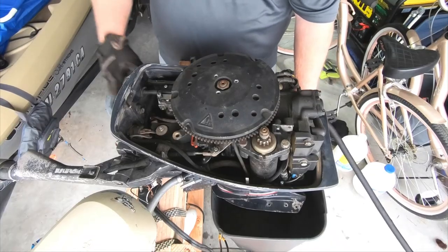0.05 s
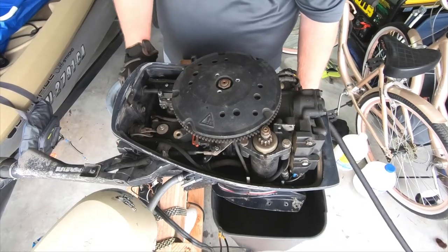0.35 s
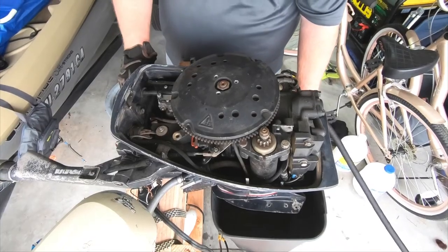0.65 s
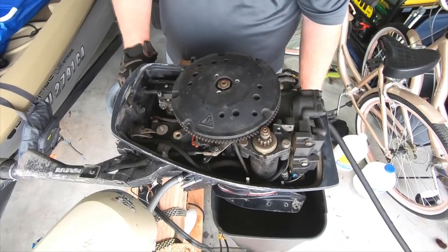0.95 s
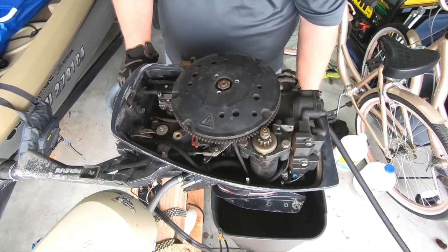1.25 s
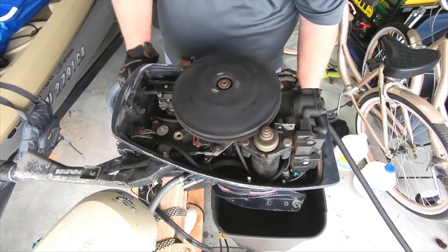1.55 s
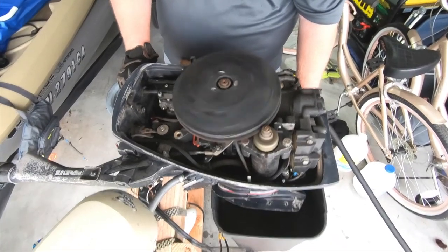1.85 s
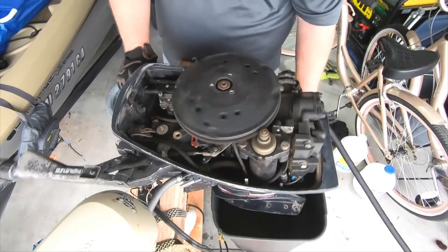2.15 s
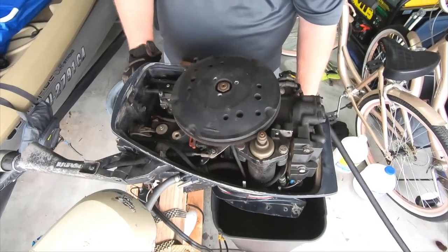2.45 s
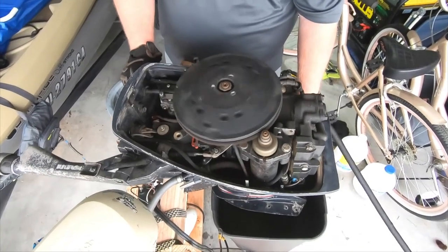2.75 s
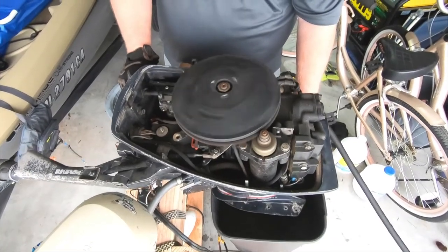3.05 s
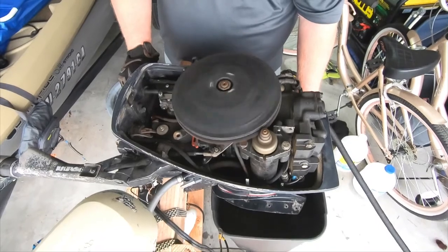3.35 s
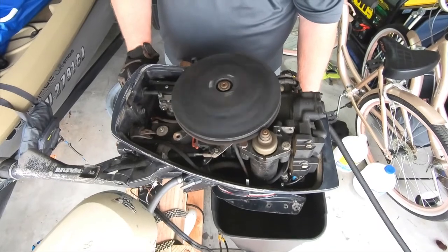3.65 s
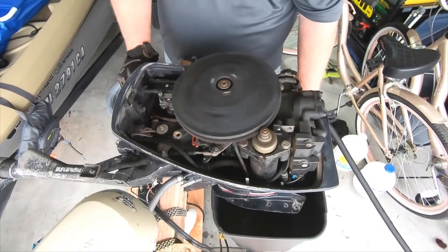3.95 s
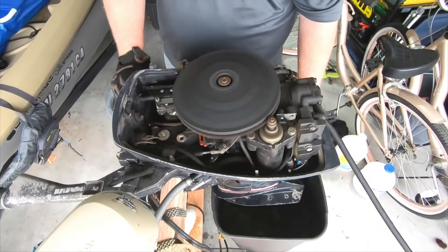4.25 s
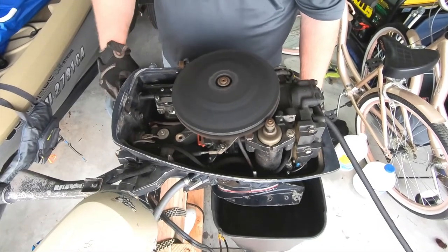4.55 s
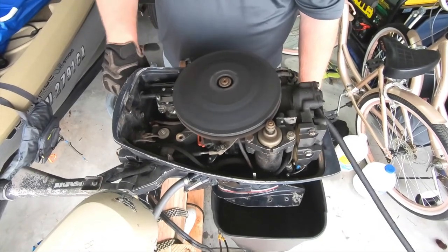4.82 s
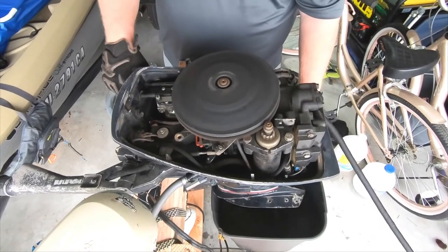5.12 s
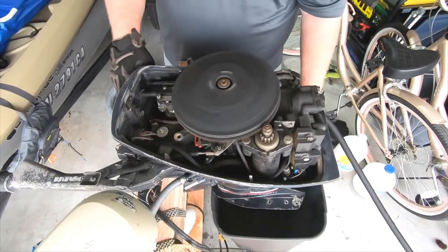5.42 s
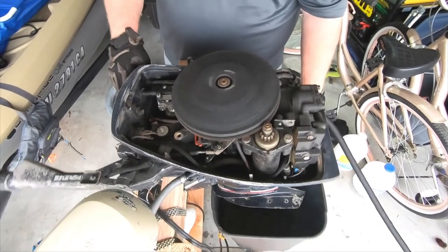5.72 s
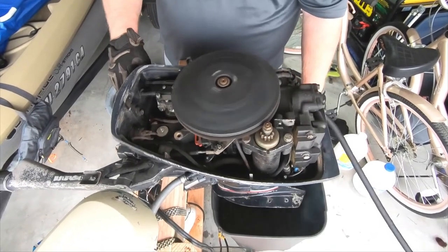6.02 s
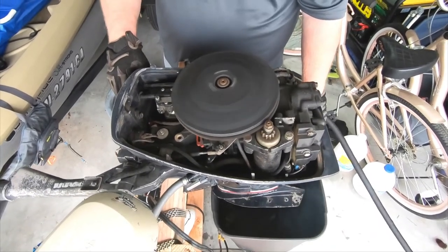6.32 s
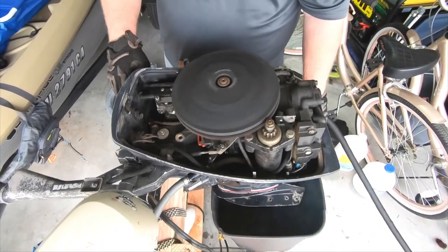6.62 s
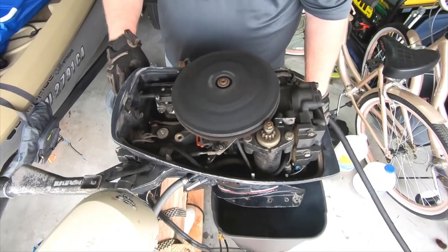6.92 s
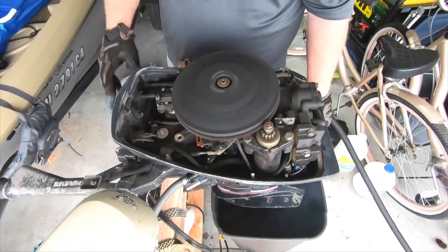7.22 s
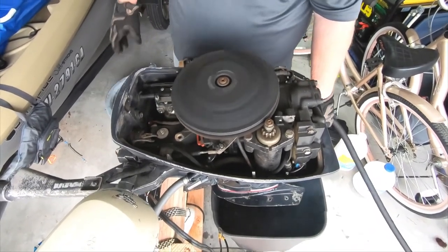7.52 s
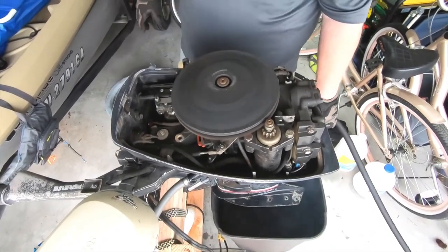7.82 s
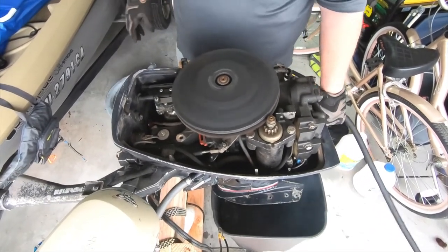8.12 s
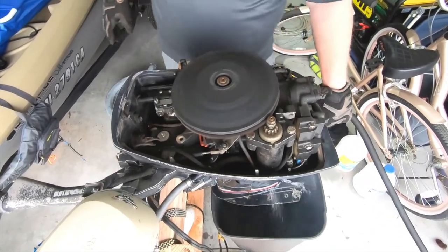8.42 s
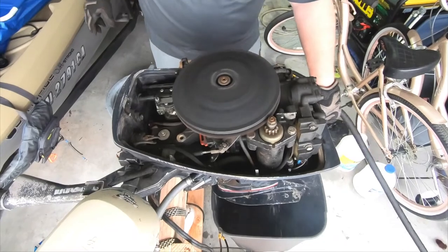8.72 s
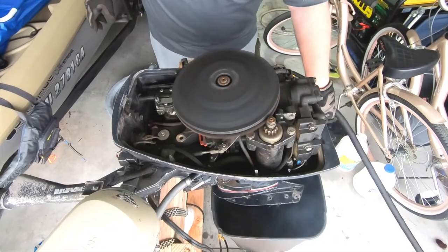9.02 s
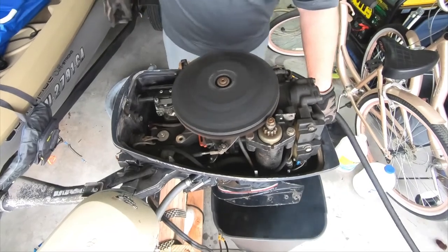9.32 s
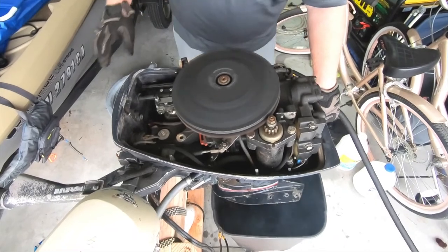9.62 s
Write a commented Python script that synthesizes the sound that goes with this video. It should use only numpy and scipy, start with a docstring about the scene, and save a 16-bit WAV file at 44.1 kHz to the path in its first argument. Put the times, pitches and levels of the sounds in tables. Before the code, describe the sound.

Close by in a garage, a small outboard motor is started while its cooling water splashes faintly into a tub. The starter engages with a steel clank and rasps in pulses, twice. On the second try the engine fires and speeds up, then slows to a weak sputter. It picks up again and idles unevenly, with hollow exhaust pops, metallic clatter and a low rumble.

```python
"""A small two-stroke outboard starts up, uncowled in a garage, its cooling water splashing into a tub.
The electric starter clanks in and grinds twice, pinion teeth rasping on the ring gear. On the second
try the engine catches, races, sags almost to a stall and settles to a lumpy idle. Only some strokes
fire fully, each ringing the exhaust housing with a round putt, while pistons and linkage clatter."""
import sys
import numpy as np
from scipy import signal
from scipy.fft import rfft, irfft
from scipy.io import wavfile
from scipy.ndimage import uniform_filter1d, minimum_filter1d

SR = 44100
rng = np.random.default_rng(int(sys.argv[2]) if len(sys.argv) > 2 else 0)


def digitize_waveform(pressure):
    """Quantize a signal to 16-bit integers and store it at the path in sys.argv[1].

    Rows of a 2-D input are taken as channels; values are limited to [-1, 1].
    """
    field = np.atleast_2d(pressure).T
    bounded = np.clip(field, -1, 1)
    quanta = np.round(bounded * 32767).astype(np.int16)
    wavfile.write(sys.argv[1], SR, quanta)


N = 435266
TIME = np.arange(N) / SR

# fader ride of the cooling water: t/s, level/dB
WATER_RIDE = [(0, -39.5), (1.35, -38), (2.1, -43.5), (2.55, -46.5), (4.2, -36.5), (9.87, -35)]
# bigger splashes: t/s, level/dB
SPLASHES = [(0.86, -42), (1.04, -38)]
# EQ of the spatter: f/Hz, level/dB
WATER_EQ = [(30, -52), (70, -8.5), (110, -23.5), (240, -0.5), (370, -16.5), (490, -6), (680, -16),
            (1100, -14), (2100, -19.5), (3300, -33), (4400, -23), (6000, -24.5), (7200, -37),
            (11000, -55.5), (15000, -80)]
# hollow tub: f/Hz, level/dB, t60/s
TUB_MODES = [(243, -0.5, 0.1), (476, -6, 0.14), (498, 1.5, 0.096), (845, -10, 0.037), (1080, -7, 0.047),
             (1579, -3.5, 0.29)]
# fader ride of the faint high hiss: t/s, level/dB
HIGH_HISS_RIDE = [(0, -63.5), (1.3, -61.5), (2.1, -50), (2.45, -74), (4.3, -69), (5.15, -63), (5.45, -84),
                  (7, -85), (8.8, -62.5), (9.87, -61.5)]
# the pinion slams into the ring gear or is kicked back: t/s, level/dB
CLANKS = [(1.3283, -30), (1.3642, -9), (2.112, -35), (2.138, -9), (2.169, -13), (2.2, -8), (2.655, -29.5),
          (2.671, -16), (3.9827, -10), (4.0239, -12), (4.058, -11), (4.1042, -13), (4.1682, -17),
          (4.202, -23)]
# EQ of grinding, cracking steel: f/Hz, level/dB
GRIND_EQ = [(100, -10), (300, -6.5), (480, 2), (650, -2.5), (800, 2.5), (1050, -4), (1500, 4), (2100, -0.5),
            (3500, -4.5), (4300, 1), (5600, -0.5), (6900, -7.5), (7800, -21), (11200, -44.5), (13000, -31),
            (15500, -56)]
# starter bracket, knocked by the clanks: f/Hz, level/dB, t60/s
BRACKET_MODES = [(489, -12, 0.14), (623, -7, 0.11), (835, -1.5, 0.11), (926, 2.5, 0.091), (1270, 8, 0.05)]
# bell tone of the flywheel: f/Hz, level/dB, t60/s
FLYWHEEL_MODES = [(2755, 0, .13), (2790, -4, .1)]
# the tub's hollow mid hum swells during the first try: t/s, level/dB
TUB_HUM_SWELLS = [(1.36, -30.5)]
# each try of the starter: engages/s, lets go/s, spin-up/s, level/dB
STARTER_TRIES = [(1.362, 2.092, 0.2, 1.5), (2.669, 3.983, 0.2, 0)]
# starter and ring gear: f/Hz, level/dB, t60/s
GEAR_MODES = [(517, -11, 0.13), (1273, -7.5, 0.11), (1350, -9.5, 0.051), (1491, 0.5, 0.079),
              (1548, -2, 0.036), (1735, -8, 0.033), (4290, -15.5, 0.17), (4410, -7.5, 0.053),
              (6620, -7, 0.074), (6750, -44, 0.12)]
# hard jolts of the mount under the starter's load: t/s, level/dB
JOLTS = [(1.385, -20), (1.535, -23.5), (1.7, -28), (2.16, -23.5), (2.21, -32.5), (2.685, -13.5),
         (3.03, -22), (3.405, -25), (3.99, -21)]
# shuddering mount: f/Hz, level/dB, t60/s
MOUNT_MODES = [(65, -16, .12), (162.3, 7.5, 0.079), (164.4, 0.5, 0.18), (239.2, 0, 0.15),
               (283, -3.5, 0.095)]
# engine speed: t/s, rate/(strokes per s)
ENGINE_SPEED = [(4.05, 25.5), (4.17, 44), (4.5, 47), (4.63, 48.3), (4.83, 33.2), (5.08, 30.5), (5.3, 20.5),
                (5.6, 21.5), (6.0, 18.1), (6.5, 17.9), (6.65, 25), (7.2, 26.4), (7.75, 29), (7.9, 31.3),
                (9.9, 32.8)]
# the pops, strokes that fire fully: t/s, ring level/dB, thump level/dB
POPS = [(4.0472, -26, -9), (4.0796, -26, -15.5), (4.1101, -17, -8), (4.1836, -9, -10), (4.273, -14.5, -12),
        (4.337, -15, -15.5), (4.5074, -12, -16), (4.7398, -23, -18), (4.9064, -22, -15.5),
        (5.1034, -20.5, -14.5), (5.2158, -26, -19), (5.4044, -31, -21.5), (5.456, -20, -11.5),
        (5.5866, -26, -31), (5.7539, -25, -10.5), (5.902, -28, -20), (6.0148, -28, -19), (6.0779, -26, -11),
        (6.2215, -28, -16), (6.2712, -18.5, -12), (6.4135, -26, -19.5), (6.5806, -20.5, -10),
        (6.699, -22, -15), (6.7389, -18.5, -10.5), (6.818, -16.5, -11), (6.9776, -18.5, -10),
        (7.1325, -17.5, -12.5), (7.2103, -18.5, -21), (7.2497, -19.5, -11.5), (7.2852, -15.5, -15.5),
        (7.4268, -19, -25), (7.4655, -22, -14.5), (7.579, -14, -11.5), (7.6762, -16.5, -26),
        (7.8582, -12, -12), (7.9509, -17.5, -14.5), (8.0478, -15, -15.5), (8.1428, -21, -17.5),
        (8.176, -16.5, -28), (8.2091, -19, -20), (8.2417, -13.5, -15), (8.4253, -13, -17.5),
        (8.5148, -16, -31), (8.606, -14, -20), (8.6672, -14.5, -16), (8.7887, -14, -16),
        (8.8827, -15.5, -18), (8.9779, -15.5, -18), (9.1046, -12.5, -17), (9.228, -13, -15),
        (9.3493, -13, -16.5), (9.4102, -16.5, -41), (9.4708, -13.5, -17), (9.5921, -14.5, -34),
        (9.6546, -14, -15.5), (9.7753, -14, -25), (9.8375, -14, -14)]
# ring of the exhaust housing: f/Hz, level/dB, t60/s
EXHAUST_MODES = [(436, 0, 0.1), (469.8, 7.5, 0.083), (520.7, 5, 0.062)]
# the housing's deeper thump: f/Hz, level/dB, t60/s
THUMP_MODES = [(174.3, 3.5, 0.046), (234.5, -3, 0.12), (291.6, -2, 0.11), (295, -11, 0.0043)]
# EQ of piston knocks and spitting gas: f/Hz, level/dB
CLATTER_EQ = [(80, -12.5), (300, 19), (700, 4.5), (1100, 12), (1600, 6.5), (2300, -0.5), (2800, 1.5),
              (3300, -9), (4300, -4), (5000, -1.5), (5800, -5), (7000, -17), (9000, -25), (11200, -53),
              (15000, -45)]
# engine block: f/Hz, level/dB, t60/s
BLOCK_MODES = [(1509, -5, 0.18), (2750, -3.5, 0.058), (4217, 3.5, 0.025), (4620, -5, 0.045),
               (5670, -2, 0.044)]
# EQ of the exhaust's bark: f/Hz, level/dB
BARK_EQ = [(150, -21.5), (360, 2), (580, 4.5), (750, -8), (1050, 2.5), (2000, -22.5), (6000, -54)]
# leg and tub, shaken by every stroke: f/Hz, level/dB, t60/s
PUMP_MODES = [(68.4, -18.5, 0.59), (98.3, 4, 0.14), (143.8, 4, 0.24), (166.5, 5, 0.062),
              (240.8, -3.5, 0.13), (277, -22.5, 0.051), (468.4, -0.5, 0.16)]
# EQ of the stand rumbling under the running engine: f/Hz, level/dB
RUMBLE_EQ = [(20, -14.5), (32, -11), (62, 0), (110, -4.5), (170, -1), (400, -19.5), (1500, -75.5)]
# loose linkage clinks: t/s, level/dB
CLINKS = [(5.378, -47), (5.421, -38), (6.552, -27.5)]


def from_db(db):
    return 10 ** (np.asarray(db) / 20)


def rms_one(x):
    return x / np.sqrt(np.mean(x ** 2) + 1e-20)


def band(x, low_hz, high_hz, order=2):
    sos = signal.butter(order, [low_hz, min(high_hz, .45 * SR)], "band", fs=SR, output="sos")
    return signal.sosfilt(sos, x)


def fader(ride, fade_s=0.006):
    """Gain that follows a fader ride, silent outside its span."""
    s, db = np.transpose(ride)
    inside = np.clip(np.minimum(TIME - s[0], s[-1] - TIME) / fade_s + 2, 0, 1)
    return inside * from_db(np.interp(TIME, s, db))


def swells(events, rise_s):
    """Each event swells to its level in the rise time and ebbs away."""
    ages = [(np.maximum(TIME - s, 0) / rise_s, db) for s, db in events]
    return sum(from_db(db) * age * np.exp(1 - age) for age, db in ages)


def clicks(times, db):
    """One impulse at each moment."""
    samples = np.clip(np.round(times * SR).astype(int), 0, N)
    return np.bincount(samples, from_db(db), N + 1)[:N]


def ring(x, hz, t60):
    """A resonator: a unit click sets a sine of height 1 ringing."""
    r, w = from_db(-60 / (t60 * SR)), 2 * np.pi * hz / SR
    return signal.lfilter([0, np.sin(w)], [1, -2 * r * np.cos(w), r * r], x + 1e-18)


def struck(times, db, modes, vary_db):
    """Each blow strikes each mode with a strength of its own; one row per mode."""
    return np.array([ring(clicks(times, db + level + rng.normal(0, vary_db, len(times))), hz, t60)
                     for hz, level, t60 in modes])


def driven(x, modes):
    """Modes kept ringing by a continuous drive, lows and highs trimmed; rms 1."""
    rings = sum(from_db(level) * rms_one(ring(x, hz, t60)) for hz, level, t60 in modes)
    return rms_one(band(rings, .75 * modes[0][0], 1.3 * modes[-1][0]))


def levelled(x, window_s):
    """A leveller: irons out slow swells, leaving the rms near 1."""
    size = int(window_s * SR)
    power = uniform_filter1d(uniform_filter1d(x ** 2, size), size)
    return x / np.sqrt(np.abs(power) + 1e-4 * np.mean(x ** 2))


def bursts(hits, t60):
    """Every hit gets a decaying tail of noise."""
    energy = signal.lfilter([1], [1, -from_db(-120 / (t60 * SR))], hits ** 2 + 1e-18)
    return np.sqrt(energy) * rng.standard_normal(N)


def eq(x, curve, size=2048):
    """Minimum-phase EQ that keeps the power of white noise."""
    hz, db = np.transpose(curve)
    grid_hz = np.maximum(np.fft.rfftfreq(size, 1 / SR), 1)
    gain = rms_one(from_db(np.interp(np.log(grid_hz), np.log(hz), db)))
    cepstrum = irfft(np.log(gain))
    cepstrum[1:size // 2] *= 2
    cepstrum[size // 2 + 1:] = 0
    return signal.oaconvolve(x, irfft(np.exp(rfft(cepstrum))))[:N]


def garage(x, wet_db, t60=0.48, predelay_s=0.016):
    """Clutter and walls return a short diffuse tail."""
    t = TIME[:SR // 2]
    tail = rng.standard_normal(len(t)) * from_db(-60 * t / t60) * (t > predelay_s)
    return x + from_db(wet_db) * signal.oaconvolve(x, tail / np.linalg.norm(tail))[:N]


def water(drops_per_s=900, tub_db=-10):
    """Cooling water spatters without pause and keeps the hollow tub humming."""
    drops = (rng.random(N) < drops_per_s / SR) * rng.rayleigh(1, N)
    spatter = rms_one(bursts(drops, t60=0.14))
    hum = from_db(tub_db) * levelled(driven(spatter, TUB_MODES), 0.19)
    flow = fader(WATER_RIDE) + swells(SPLASHES, rise_s=0.016)
    return flow * (eq(spatter, WATER_EQ) + hum)


def high_hiss():
    """A thin, wide hiss comes and goes at the very top, leaning slightly left."""
    hiss = rms_one(band(rng.standard_normal((2, N)), 12000, 14300, order=3))
    return fader(HIGH_HISS_RIDE) * hiss * from_db([[1], [-1]])


def pinion(crack_db=-3, edge_db=-21, knock_db=-15.5, bell_db=-9.5):
    """Steel slams on the flywheel's rim: a bright-edged crack, a bracket knock and a bell tone."""
    s, db = np.transpose(CLANKS)
    blows = bursts(clicks(s, db + crack_db), t60=0.06)
    crack = eq(blows, GRIND_EQ) + from_db(edge_db) * band(blows, 7400, 20000)
    knock = struck(s, db + knock_db, BRACKET_MODES, vary_db=1).sum(0)
    bell = struck(s, db + bell_db, FLYWHEEL_MODES, vary_db=1.5).sum(0)
    return crack + band(knock, 380, 2000) + band(bell, 1500, 5000)


def tub_hum_swell():
    """The tub's hollow mid hum swells during the first try."""
    hum = band(driven(rng.standard_normal(N), TUB_MODES), 410, 900, order=3)
    return swells(TUB_HUM_SWELLS, rise_s=0.18) * rms_one(hum)


def crank(engages, lets_go, spin_up, coast_s=0.3, compressions_per_s=11.2):
    """The flywheel spins up, then coasts when let go: share of full speed, compressions passed."""
    speed = 1 - np.exp(-np.maximum(TIME - engages, 0) / spin_up)
    speed *= np.exp(-np.maximum(TIME - lets_go, 0) / coast_s)
    return speed, np.cumsum(speed) * compressions_per_s / SR


def starter_load(lag_cycles, ease_db, slow_ease_db=18.5, release_db_per_s=93):
    """Envelope of the starter's effort: it eases between compressions, most while still slow."""
    load = 0
    for engages, lets_go, spin_up, db in STARTER_TRIES:
        speed, passed = crank(engages, lets_go, spin_up)
        between = .5 - .5 * np.cos(2 * np.pi * (passed - lag_cycles * speed))
        dip_db = between * (ease_db + slow_ease_db * (1 - speed) * (TIME < lets_go))
        release_db = release_db_per_s * np.maximum(TIME - lets_go, 0)
        load += (TIME > engages) * from_db(db - dip_db - release_db)
    return load


def starter(teeth_per_s=480, casing_db=-24.5, gear_db=-26, flywheel_db=-27.5, shudder_db=-25.5):
    """Teeth knock unevenly on the ring gear: the casing rasps, the flywheel rings, the mount shudders."""
    times = np.cumsum(rng.uniform(.5, 1.5, 6000)) / teeth_per_s
    tooth_db = 3.5 * np.clip(rng.standard_normal(len(times)), -2, 2)
    rasp = bursts(clicks(times, tooth_db), t60=0.025)
    casing = from_db(casing_db) * levelled(eq(rasp, GRIND_EQ), 0.048)
    gears = from_db(gear_db) * levelled(driven(rasp, GEAR_MODES), 0.07)
    flywheel = from_db(flywheel_db) * levelled(driven(rasp, FLYWHEEL_MODES), 0.24)
    mount = levelled(band(driven(rasp, MOUNT_MODES), 156, 297), 0.034)
    shudder = from_db(shudder_db) * starter_load(lag_cycles=0.19, ease_db=4)
    return (casing * starter_load(lag_cycles=0.014, ease_db=5)
            + gears * starter_load(lag_cycles=0, ease_db=2)
            + flywheel * starter_load(lag_cycles=-0.31, ease_db=4.5)
            + mount * (shudder + swells(JOLTS, rise_s=0.021)))


def grunt(start_hz=199.4, end_hz=129.2, sink_s=0.0266, delay_s=0.015, grunt_db=-14.5):
    """The starter strains against the standing flywheel and its pitch sinks."""
    grunts = 0
    for engages, _, _, db in STARTER_TRIES:
        start = engages + delay_s
        hz = end_hz + (start_hz - end_hz) * np.exp(-np.maximum(TIME - start, 0) / sink_s)
        tone = np.sin(2 * np.pi * np.cumsum(hz) / SR)
        judder = 1 + 0.14 * rms_one(band(rng.standard_normal(N), 18, 120))
        grunts += swells([(start, db + grunt_db)], rise_s=0.016) * judder * tone
    return grunts


def cranking(puff_db=-25, rumble_db=-43):
    """Unfired cylinders puff once per compression over a low rumble, both stronger at speed."""
    puffs, turning = 0, 0
    for engages, lets_go, spin_up, db in STARTER_TRIES:
        speed, passed = crank(engages, lets_go, spin_up)
        compressions = np.diff(np.floor(passed), prepend=0)
        puffs += compressions * speed * from_db(db + puff_db)
        turning += speed ** 2
    rumble = from_db(rumble_db) * turning * rms_one(band(rng.standard_normal(N), 50, 90))
    return band(ring(puffs, hz=66, t60=0.16), 40, 120) + rumble


def stroke_times():
    """Between two pops the pistons make the whole number of strokes that best suits their speed."""
    travel = np.cumsum(np.interp(TIME, *np.transpose(ENGINE_SPEED))) / SR
    fired = np.interp(np.array(POPS)[:, 0], TIME, travel)
    counts = np.maximum(1, np.round(np.diff(fired))).astype(int)
    strokes = [np.linspace(a, b, n, endpoint=False) for a, b, n in zip(fired, fired[1:], counts)]
    return np.interp(np.concatenate(strokes + [fired[-1:]]), travel, TIME)


def speed_octaves(s, idle_per_s=32):
    """Engine speed at the given moments, in octaves above idle."""
    return np.log2(np.interp(s, *np.transpose(ENGINE_SPEED)) / idle_per_s)


def firings(weak_db=-33, weak_db_per_octave=27, race_start_s=4.12, race_end_s=4.34, fade_db_per_s=52):
    """How hard each stroke burns, from weak to a full pop: t/s, ring level/dB, thump level/dB."""
    s = stroke_times()
    pop_s, pop_ring, pop_thump = np.transpose(POPS)
    popped = np.abs(s[:, None] - pop_s).argmin(0)
    weak = weak_db + weak_db_per_octave * np.minimum(speed_octaves(s), 0)
    weak += 7.5 * rng.uniform(-2, 2.1, len(s))
    weak[popped[:-1] + 1] = pop_ring[:-1] - 8  # the stroke after a pop burns on a little
    # just after catching, the engine races and every stroke fires until the burn fades
    race_db = -15.5 - fade_db_per_s * np.maximum(s - race_end_s, 0)
    racing = np.where(s > race_start_s, race_db, -np.inf) + rng.standard_normal(len(s))
    ring_db = np.maximum(weak, racing)
    thump_db = np.maximum(weak - 9.5, racing - 3.5)
    ring_db[popped], thump_db[popped] = pop_ring, pop_thump
    return s, ring_db, thump_db


def exhaust(port_lead_s=0.003, ring_lead_s=0.0019, outlet_hz=100, muffler_hz=850):
    """Gas spits from the port, the block clinks, the housing putts and thumps, the rushing gas barks."""
    s, ring_db, thump_db = firings()
    lower, middle, upper = struck(s - ring_lead_s, ring_db - 2, EXHAUST_MODES, vary_db=0.4)
    thump = struck(s, thump_db - 1, THUMP_MODES, vary_db=0.8).sum(0)
    port_opens = s - port_lead_s
    spit = eq(bursts(clicks(port_opens, thump_db - 12.5), t60=0.089), CLATTER_EQ)
    clink = band(struck(port_opens, thump_db - 22.5, BLOCK_MODES, vary_db=3).sum(0), 2200, 6500)
    putt = garage(middle - lower - upper, wet_db=-16)  # alternating signs round off the attack
    bark = from_db(-20) * eq(putt * rng.standard_normal(N), BARK_EQ)
    body = band(putt + garage(thump, wet_db=-3.5), outlet_hz, muffler_hz, order=3)
    return body + garage(spit + bark + clink, wet_db=-3)


def pistons(pump_db=-27.5, clatter_db=-41, rumble_db=-36, tilt_db_per_octave=2.5, fade_in_s=0.42):
    """Each stroke pumps the leg, knocks the piston twice and ticks the linkage; the stand rumbles."""
    s = stroke_times()
    period = np.gradient(s)
    pump = band(struck(s, 0, PUMP_MODES, vary_db=4.5).sum(0), 49, 500)
    # knock, slap as the piston changes sides, linkage tick: a third of a stroke apart
    lags = [0.4 + third / 3 + rng.normal(0, 0.012, len(s)) for third in range(3)]
    hit_s = np.concatenate([s + period * lag for lag in lags])
    hit_db = np.repeat([0, -8, -14.5], len(s)) + rng.normal(0, 3.5, len(hit_s))
    knocks = eq(bursts(clicks(hit_s, hit_db), t60=0.05), CLATTER_EQ)
    pings = band(struck(hit_s, hit_db, BLOCK_MODES, vary_db=2.5).sum(0), 1200, 6200, order=4)
    metal = from_db(3) * levelled(knocks, 0.32) + from_db(-1.5) * levelled(pings, 0.17)
    tilt_db = tilt_db_per_octave * speed_octaves(TIME)  # more clatter, less pumping at speed
    clatter = from_db(clatter_db + tilt_db) * metal
    pumping = from_db(pump_db - tilt_db) * levelled(pump, 0.22)
    rumble = from_db(rumble_db) * eq(rng.standard_normal(N), RUMBLE_EQ, size=8192)
    running = np.clip((TIME - s[0]) / fade_in_s, 0, 1)
    return running * (pumping + rumble + clatter)


def linkage(ping_db=-6):
    """Now and then the loose linkage clinks against the block."""
    s, db = np.transpose(CLINKS)
    crack = eq(bursts(clicks(s, db), t60=0.05), GRIND_EQ)
    return crack + struck(s, db + ping_db, BLOCK_MODES, vary_db=3).sum(0)


def scene():
    """Motor and tub sit dead centre; only the faint high hiss has width."""
    powerhead = starter() + grunt() + pinion() + cranking() + pistons() + linkage()
    return garage(powerhead, wet_db=-10.5) + exhaust() + water() + tub_hum_swell() + high_hiss()


def record(dry, ceiling=0.58, cutoff_hz=15500):
    """A fast limiter holds the hardest blows down and a steep low-pass takes off the very top."""
    needed_gain = np.minimum(1, ceiling / (np.abs(dry).max(0) + 1e-9))
    smooth_gain = uniform_filter1d(minimum_filter1d(needed_gain, size=100), size=100)
    low_pass = signal.ellip(10, .1, 90, cutoff_hz, fs=SR, output="sos")
    return signal.sosfilt(low_pass, dry * smooth_gain)


dry = scene()
out = record(dry)
digitize_waveform(out)
```